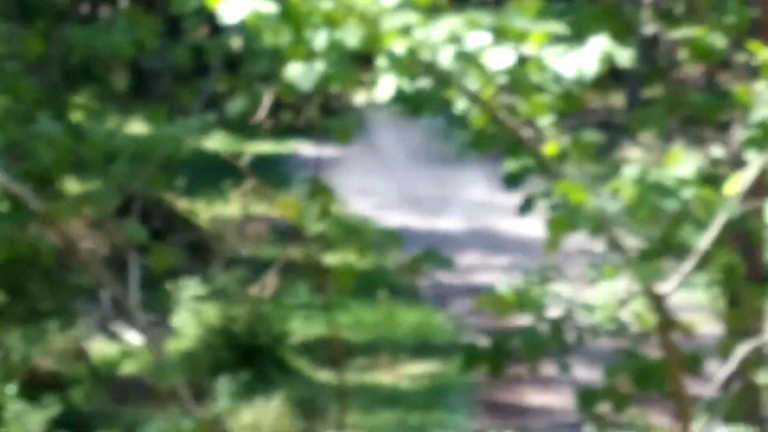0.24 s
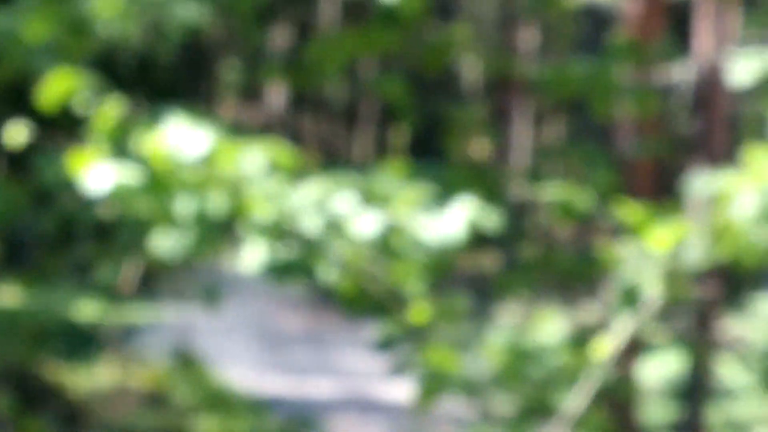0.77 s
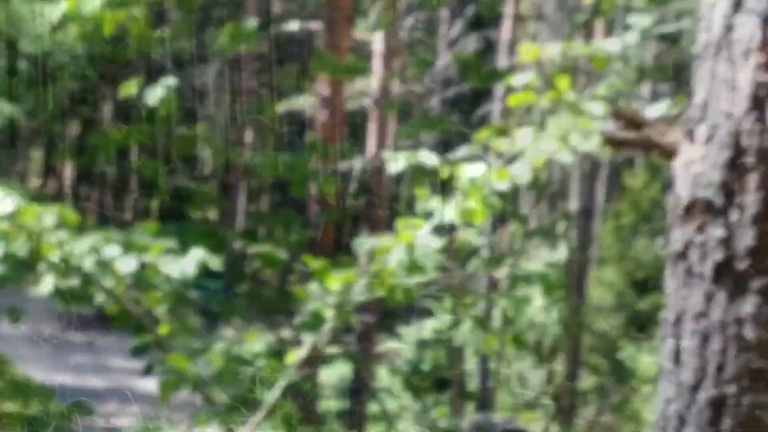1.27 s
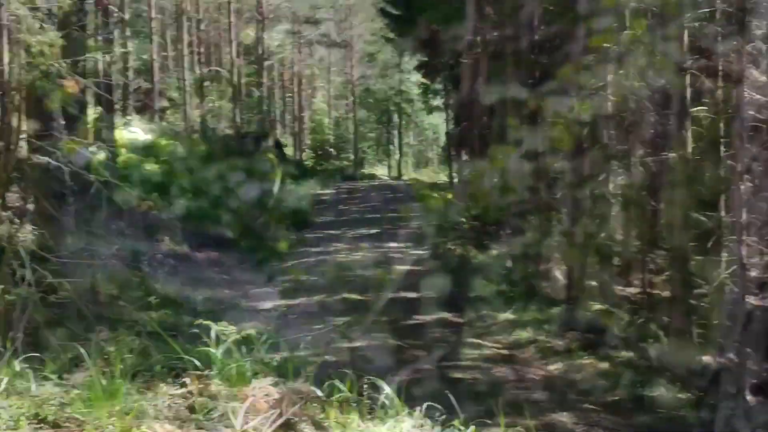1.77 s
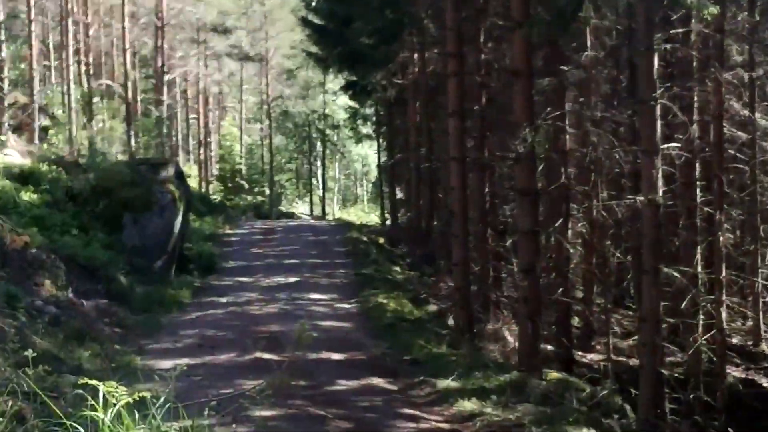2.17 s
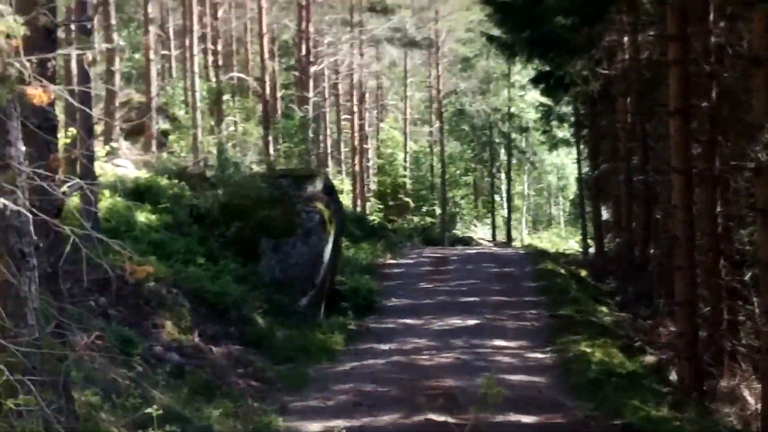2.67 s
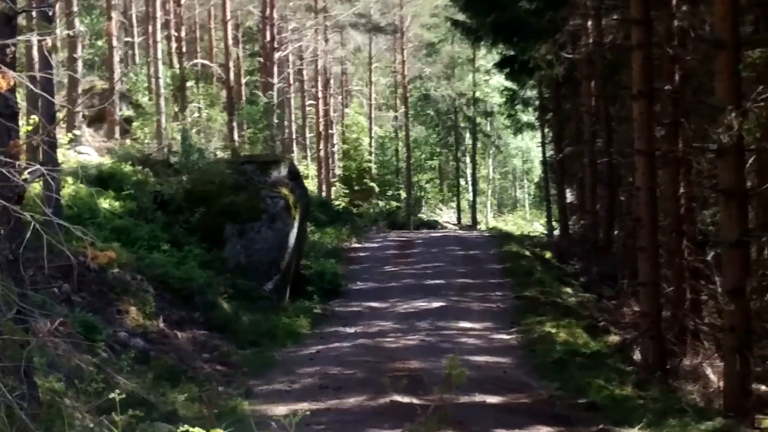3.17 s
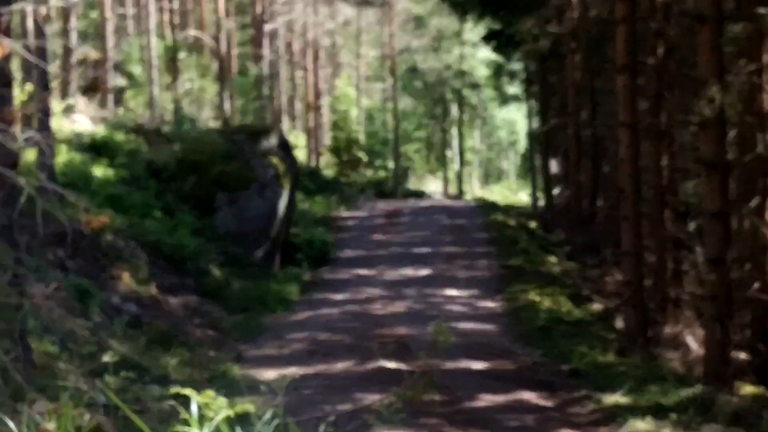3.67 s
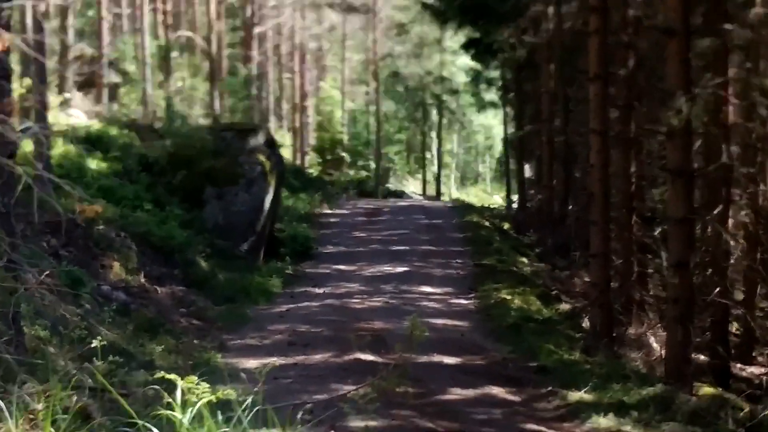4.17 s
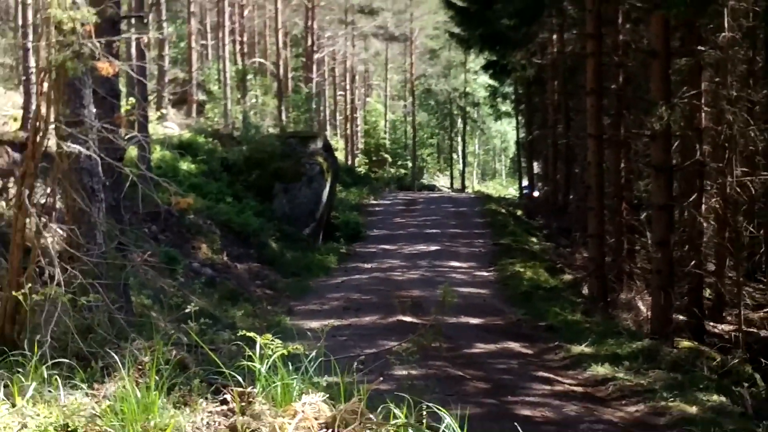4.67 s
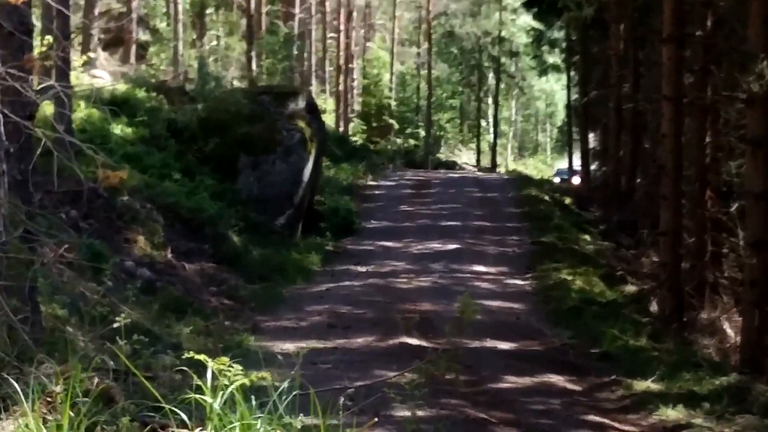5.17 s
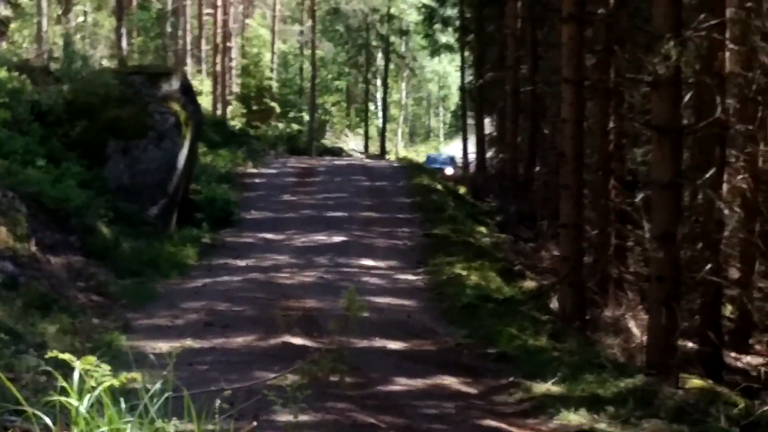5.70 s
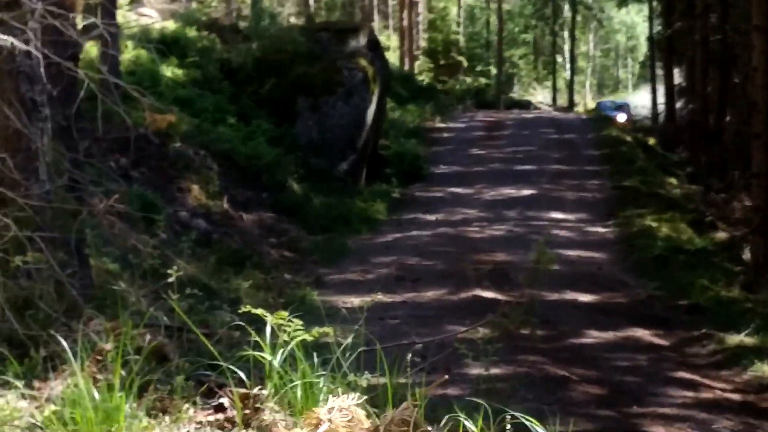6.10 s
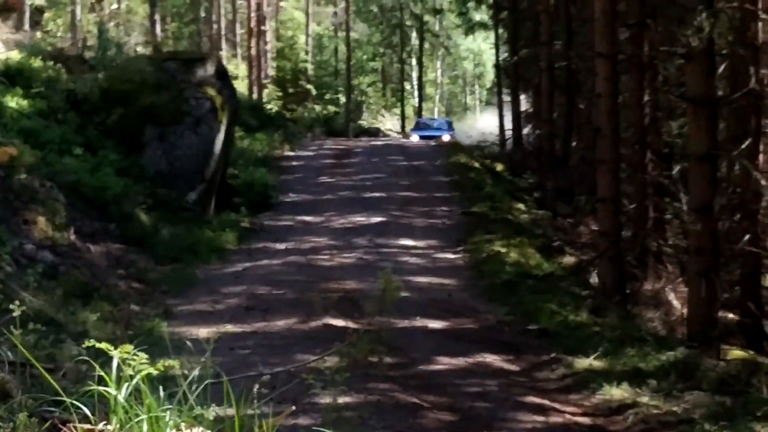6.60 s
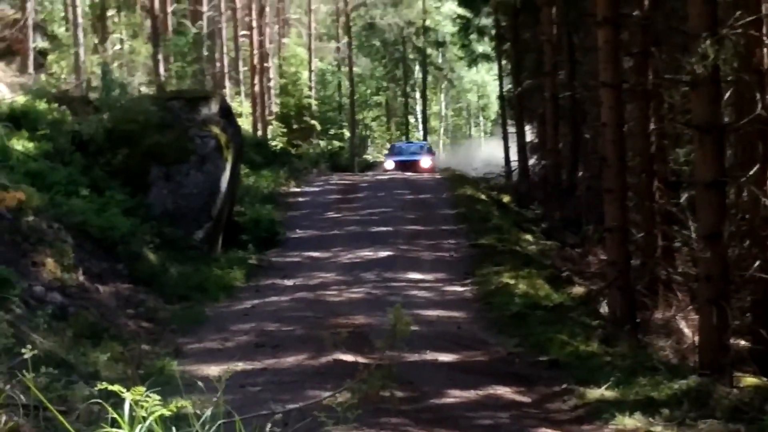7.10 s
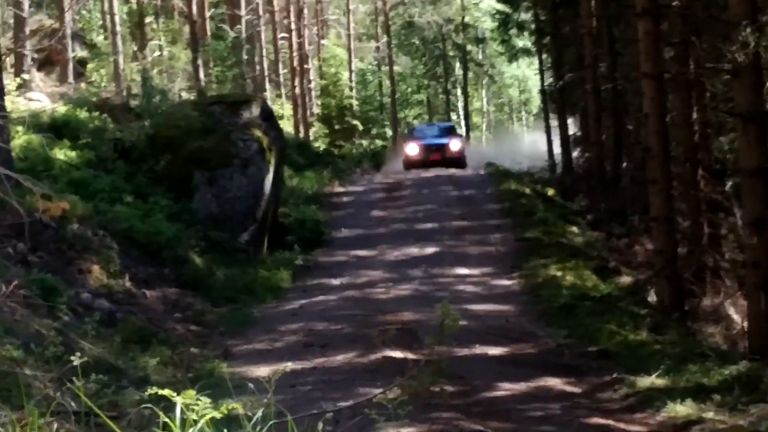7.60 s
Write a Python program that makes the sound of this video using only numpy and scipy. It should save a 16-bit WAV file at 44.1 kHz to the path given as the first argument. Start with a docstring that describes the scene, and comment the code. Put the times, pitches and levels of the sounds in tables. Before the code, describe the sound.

Still forest beside a gravel road, microphone close to the verge. From 0 s a rally car that has just passed roars at overwhelming level, lifts around 0.2 s, bangs at 0.4 s, and fires a cluster of hard exhaust cracks at 0.75-0.85 s as its revs sag. It pulls again, raspy and steely, rising in pitch and fading over gravel until trees cut it off near 1.9 s. From 2.2 s a much quieter second engine barks far away, with gear changes near 3.4 and 4.2 s, echoing among trunks. It lifts around 5.4 s; tyres scrabble in gravel at 5.5-6.2 s and the low engine burbles, with throttle dabs from 6.7 s. Small twigs tick throughout, sharper at 5.9 s and loudest at 6.96 s. Around 7.45 s the car crests: tyre roar surges, grit hisses and stones knock hollowly underneath until the end at about 7.85 s.

```python
"""Two rally cars on a gravel forest road, in still air; twigs snap close by now and then.
The first has just passed: its exhaust (firing tones, pipe overtones, gas noise) lifts, bangs through
a gear change, pulls away over noisy gravel and drops behind the trees. A second car, summed from lines of
its engine cycle, works through the revs far off. It slows for a bend, burbling on dabs of throttle, then
comes over the crest with roaring tyres and stones ringing its floor. Trunks scatter echoes of both."""
import sys
import numpy as np
from scipy import signal
from scipy.fft import rfft, irfft, next_fast_len
from scipy.io import wavfile
from scipy.ndimage import uniform_filter1d, minimum_filter1d

SR = 44100
rng = np.random.default_rng(int(sys.argv[2]) if len(sys.argv) > 2 else 0)


def pcm_store(signal):
    """Save signal as 16-bit PCM."""
    levels = np.round(np.clip(np.atleast_2d(signal), -1, 1) * 32767)
    wavfile.write(sys.argv[1], SR, levels.astype(np.int16).T)


N = 346185
TIME = np.arange(N) / SR  # [s]


def amp(db):
    """Decibels to gain."""
    return 10 ** (np.asarray(db) / 20)


def evened(x):
    """Scales to an rms of one."""
    return x / np.sqrt(np.mean(x ** 2) + 1e-20)


def read(points, hz):
    """A spectrum's gain at hz, interpolated in dB over log frequency."""
    f, db = np.transpose(points)
    return amp(np.interp(np.log(hz + 1), np.log(f + 1), db))


def follow(rows):
    """Each column of a curve table at every sample."""
    s, *columns = np.transpose(rows)
    return [np.interp(TIME, s, c) for c in columns]


def during(span, fade):
    """One within a span of time, decaying exponentially outside it."""
    outside = np.maximum(np.maximum(span[0] - TIME, TIME - span[1]), 0)
    return np.exp(-outside / fade)


def swell(s, width):
    """A Gaussian hump of height one around time s."""
    return np.exp(-((TIME - s) / width) ** 2)


def add(mix, s, sound):
    """Mixes a sound in at time s."""
    part = mix[max(round(s * SR), 0):][:len(sound)]
    part += sound[:len(part)]


def colour(x, points):
    """Gives x a spectrum and an rms of one."""
    size = next_fast_len(len(x) + 4096)
    gain = read(points, np.fft.rfftfreq(size, 1 / SR))
    return evened(irfft(rfft(x, size) * gain, size)[:len(x)])


def drift(hz):
    """Slow chance of rms one, with changes up to about hz."""
    knots = rng.standard_normal(4096)
    return evened(np.interp(TIME * 2 * hz, np.arange(len(knots)), knots))


def fading(turns, depth, hz, scatter=1):
    """A tone by many shifting paths between the trunks; its phase starts up to scatter turns on."""
    angle = 2 * np.pi * (turns + scatter * rng.random())
    in_phase = (1 + depth * drift(hz)) * np.cos(angle)
    quadrature = depth * drift(hz) * np.sin(angle)
    return np.sqrt(2 / (1 + 2 * depth ** 2)) * (in_phase + quadrature)


def puffs(turns, duty, steady):
    """Gas noise that bursts out once a turn, over a steady flow."""
    return (steady + np.exp(-(turns % 1) / duty)) * rng.standard_normal(N)


def throttle(rows, overrun, lift):
    """Each engine quality builds from its overrun value while the throttle is open, falls back on the lift."""
    rest = np.array(overrun)[:, None]
    out = rest + np.zeros(N)
    for opens, shuts, build, *loaded in rows:
        opening = 1 - np.exp(-np.maximum(TIME - opens, 0) / build)
        closing = np.exp(-np.maximum(TIME - shuts, 0) / lift)
        out = out + opening * closing * (np.array(loaded)[:, None] - rest)
    return out


AWAY_S, GONE_S, GONE_FADE_S = 1.133, 1.83, 0.069  # first car draws away; drops behind the trees


def away():
    """Seconds for which the first car has been drawing away."""
    return np.maximum(TIME - AWAY_S, 0)


# first car's revs, sagging through the gear change: (time [s], firing rate [Hz])
NEAR_REVS = [(0, 227.8), (.2, 234), (.3, 235.2), (.45, 217.4), (.56, 217.8), (.66, 211.7), (.76, 177.9),
             (.85, 186.7), (.91, 205.5), (.98, 228.2), (1.1, 238.6), (1.23, 247.8), (1.53, 256.6),
             (1.72, 265.3), (1.82, 273), (2.02, 248)]
# first car on the throttle: (opens [s], shuts [s], build-up [s], firing tone [dB], octave [dB],
# rasp [dB], metallic edge [dB], roughness [0-1])
NEAR_THROTTLE = [(-.1, .222, .02, -10.5, -16, -18, -30, 0.71),
                 (.43, .55, 0.005, -24.5, -26, -22, -35, 0.97),
                 (.84, 1.895, 0.033, -4.5, -17, -15.5, -17, 0.57)]
# exhaust's two lowest resonances, swept by the low tones: (frequency [Hz], gain [dB])
NEAR_BOOM = [(190, 4.5), (228, -1), (246, 0.5), (259, -6.5), (274, -4.5), (455, -3), (490, -3.5), (513, 8),
             (535, -1)]
# tailpipe response to the firing pulses: (frequency [Hz], gain [dB])
NEAR_PIPE = [(560, 6.5), (695, 9.5), (780, -5.5), (920, -2.5), (1020, 10), (1230, 0.5), (1450, -5),
             (1700, -22.5), (2200, -54)]
# gas rush from the tailpipe: (frequency [Hz], relative density [dB per Hz])
NEAR_RUSH = [(25, -26.5), (70, -5), (150, 1.5), (260, 6), (450, 4.5), (800, 2), (1250, 3.5), (1600, -4),
             (2100, -20.5), (3000, -20.5), (6000, -68.5)]
# ring of the thin steel pipe: (frequency [Hz], gain [dB])
NEAR_EDGE = [(1200, -27), (1650, -9), (1980, 8), (2250, 0), (2500, -1), (2950, -12), (3250, -18),
             (4200, -24.5), (5500, -39), (7000, -46), (10000, -55), (14000, -67)]
# throttle shut: firing tone, octave, rasp, edge [dB]; roughness, clipped to 0-1 in use
NEAR_OVERRUN = (-28, -40.5, -29, -39, 1.13)
NEAR_LIFT_S = 0.018
BOOM_FALL_DB_PER_S, RASP_FALL_DB_PER_S, EDGE_FALL_DB_PER_S = 13.5, 14.5, 17.5
CLEARS_PER_S = 0.28  # roughness lost as it pulls away
FLARE_S, FLARE_WIDTH_S, FLARE_DB = 1.222, 0.012, 16  # octave flares briefly
DIP_S, DIP_WIDTH_S, DIP_DB = 1.58, 0.11, -6  # metallic edge dips briefly
EDGE_KNEE_HZ, EDGE_DB_PER_HZ = 226, -0.05  # edge strengthens as the firing rate drops below the knee


def near_car():
    """Four-cylinder exhaust: two low tones, pipe overtones with a steely edge, a gas rush at each firing."""
    hz, = follow(NEAR_REVS)
    tone_db, octave_db, rasp_db, edge_db, rough = throttle(NEAR_THROTTLE, NEAR_OVERRUN, NEAR_LIFT_S)
    gone = away()
    rough = np.clip(rough - CLEARS_PER_S * gone, 0, 1)
    turns = np.cumsum(hz * (1 + 0.0021 * drift(40))) / SR

    tone = amp(tone_db) * read(NEAR_BOOM, hz) * np.cos(2 * np.pi * turns)
    octave_db = octave_db + FLARE_DB * swell(FLARE_S, FLARE_WIDTH_S)
    octave = amp(octave_db) * read(NEAR_BOOM, 2 * hz) * np.cos(4 * np.pi * turns)
    boom = np.sqrt(2) * (tone + octave) * (1 + 0.16 * drift(45)) * amp(-BOOM_FALL_DB_PER_S * gone)

    # the shorter the wave, the more the trunks scatter it
    overtones = [(k, fading(k * turns, depth=0.065 * k, hz=12)) for k in range(3, 14)]
    # unequal cylinders put weak lines between the overtones
    overtones += [(k / 2, 0.0088 * k * fading(k * turns / 2, depth=0.29, hz=14)) for k in range(3, 26, 2)]
    gas = puffs(turns, duty=1.0, steady=0.81) * amp(3.0 * drift(30))

    def voiced(line_points, gas_points):
        """Overtones and gas noise, each through its response, mixed by roughness."""
        lines = evened(sum(read(line_points, k * hz) * line for k, line in overtones))
        return np.sqrt(1 - rough ** 2) * lines + rough * colour(gas, gas_points)

    rasp = amp(rasp_db - RASP_FALL_DB_PER_S * gone) * voiced(NEAR_PIPE, NEAR_RUSH)
    edge_db = edge_db + EDGE_DB_PER_HZ * np.minimum(hz - EDGE_KNEE_HZ, 0)
    edge_db = edge_db + DIP_DB * swell(DIP_S, DIP_WIDTH_S)
    edge = amp(edge_db - EDGE_FALL_DB_PER_S * gone) * voiced(NEAR_EDGE, NEAR_EDGE)
    return (boom + rasp + edge) * during((0, GONE_S), fade=GONE_FADE_S)


# wheels of either car dig into the gravel: (time [s], half-length [s], roar [dB], stone spray [dB])
SKIDS = [(.1, 0.17, -44, -53), (1.29, 0.035, -54, -46), (1.76, .08, -54, -62), (4.097, 0.17, -40.5, -68),
         (5.488, 0.05, -31, -64), (5.806, 0.24, -36.5, -64), (6.187, 0.33, -44, -62),
         (7.572, 0.12, -26, -58)]
# tyre roar: (frequency [Hz], relative density [dB per Hz])
ROAR = [(60, -37.5), (150, -4.5), (220, -12), (300, -5.5), (420, 1.5), (560, 0.5), (720, 3), (940, -6.5),
        (1150, -7), (1500, -14), (2100, -15), (2800, -25), (3600, -33.5), (5000, -64)]
# spray of small stones: (frequency [Hz], relative density [dB per Hz])
SPRAY = [(2000, -7), (3700, 4.5), (4400, -1), (5100, -1), (6200, -5.5), (7600, -12), (9200, -10.5),
         (10200, -22), (12000, -34), (15000, -44)]
# hissing grit: (frequency [Hz], relative density [dB per Hz])
SAND_TONE = [(2500, -38.5), (4000, -8), (4700, -3), (5400, -2), (6300, -12.5), (9500, -24), (11000, -46),
             (15000, -60)]
# wheel rumble: (frequency [Hz], relative density [dB per Hz])
RUMBLE_TONE = [(20, -31.5), (40, -15), (60, 0.5), (90, -2), (140, -1.5), (220, -7.5), (400, -36.5),
               (900, -66.5)]
NEAR_SPRAY_DB, NEAR_RUMBLE_DB, WHEEL_FALL_DB_PER_S = -57, -38.5, 35  # first car; fall as it draws away
CREST_S, CREST_WIDTH_S = 7.455, 0.045  # second car tops the rise, which no longer shields its tyres
APPROACH_DB_PER_S = 5  # second car's growth up to the crest
ROAR_DB, ROAR_CREST_DB = -35, 6.5  # level just below the crest, gain beyond it
SPRAY_DB, SPRAY_CREST_DB = -59.5, 4
SAND_DB, SAND_CREST_DB, SAND_SPAN_S = -57, 6.5, (7.22, 7.85)  # grit in the wheel arches, only close by
RUMBLE_DB = -38


def tyres():
    """Wheels roar and rumble on the loose road (shaped noise), throwing random stone clicks and grit hiss."""
    leaving_db = -WHEEL_FALL_DB_PER_S * away()
    nearing_db = APPROACH_DB_PER_S * np.minimum(TIME - CREST_S, 0)
    in_view = 0.5 + 0.5 * np.tanh((TIME - CREST_S) / CREST_WIDTH_S)
    roar = amp(ROAR_DB + nearing_db + ROAR_CREST_DB * in_view)
    spray = amp(SPRAY_DB + nearing_db + SPRAY_CREST_DB * in_view) + amp(NEAR_SPRAY_DB + leaving_db)
    for s, width, roar_db, spray_db in SKIDS:
        dig = swell(s, width)
        roar = np.hypot(roar, amp(roar_db) * dig)
        spray = np.hypot(spray, amp(spray_db) * dig)
    sand = amp(SAND_DB + SAND_CREST_DB * in_view) * during(SAND_SPAN_S, fade=0.065)
    rumble = amp(RUMBLE_DB + nearing_db) + amp(NEAR_RUMBLE_DB + leaving_db)
    hits = rng.random(N) < 4000 / SR  # about 4000 stones a second
    stones = hits * rng.standard_normal(N) * amp(2 * np.minimum(rng.exponential(1, N), 4))
    return (roar * amp(2.1 * drift(25)) * colour(rng.standard_normal(N), ROAR)
            + spray * amp(2.0 * drift(18)) * colour(stones, SPRAY)
            + sand * amp(1.0 * drift(30)) * colour(rng.standard_normal(N), SAND_TONE)
            + rumble * amp(0.71 * drift(8.6)) * colour(rng.standard_normal(N), RUMBLE_TONE))


# still forest air: (frequency [Hz], relative density [dB per Hz])
AIR = [(20, -27), (100, -12), (200, 12), (600, 1.5), (1500, -6.5), (2600, -9.5), (4000, -27.5),
       (6000, -30.5), (8000, -40.5), (15000, -45)]


def forest_air():
    """Steady shaped noise of the still forest."""
    return amp(-41.5) * colour(rng.standard_normal(N), AIR)


def forest(x, t60, treble_t60):
    """Scattered echoes from the trunks: sparse random taps whose treble dies first."""
    late = np.arange(SR) > SR // 100  # first echo after 10 ms
    taps = rng.standard_normal(SR) * (rng.random(SR) < 2000 / SR) * late
    hz, t, z = signal.stft(taps, SR, nperseg=256)
    decay = np.interp(hz, [300, 5000], [t60, treble_t60])[:, None]
    tail = signal.istft(z * amp(-60 * t / decay), SR, nperseg=256)[1]
    return signal.oaconvolve(x, tail / np.linalg.norm(tail))[:N]


# twig snaps and crackles: (time [s], level [dB], pitch [Hz], decay [s], low body [dB])
TWIGS = [(0.117, -44, 11000, 0.013, -12), (1.141, -39, 10200, 0.0058, -12), (1.167, -46, 9540, 0.0055, -14),
         (2.321, -35.5, 3700, 0.0043, 0), (3.262, -41, 3800, .0018, -9), (4.531, -45, 6023, 0.0015, -9),
         (4.93, -42.5, 4835, 0.0094, -9), (5.906, -27, 3850, 0.001, 2), (5.938, -45, 9200, 0.0018, -9),
         (6.932, -43, 4870, .00088, -9), (6.9604, -16.5, 3300, 0.0012, 7)]


def twigs():
    """Dry wood snaps: a noise tick around its pitch and a very short ring."""
    out, t = np.zeros(N), TIME[:SR // 20]
    for s, db, hz, decay, body_db in TWIGS:
        tick_tone = [(hz / 5, body_db), (hz * 0.39, -6), (hz, 0), (hz * 1.4, -11), (hz * 4, -27)]
        tick = colour(rng.standard_normal(len(t)), tick_tone)
        # two bending modes of a stick
        ring = np.sin(2 * np.pi * hz * t) + 0.89 * np.sin(2 * np.pi * 0.33 * hz * t)
        add(out, s, amp(db) * (0.7 * tick + 0.3 * ring) * np.exp(-t / decay))
    return out


# exhaust bangs of both cars: (time [s], level [dB], decay [s], brightness [dB per octave])
BANGS = [(.413, 0.5, .011, -1), (.527, -8.5, .006, -3), (.75, -4, 0.0096, -0.5), (.764, -5, 0.0055, 3.5),
         (.777, 9.5, .0055, 1.5), (0.794, -16.5, 0.0097, 4.5), (.814, -2.5, 0.0053, 1), (.845, -4, .009, 0),
         (2.063, -31.5, 0.025, 5.5), (5.809, -34.5, 0.022, 3.5)]
# what a bang rings in the exhaust: (frequency [Hz], level [dB])
BANG_MODES = [(85, -31), (165, -11), (238, 2), (410, -6), (520, -7.5), (1000, -20), (1230, -20.5)]


def bangs():
    """Unburnt fuel explodes in the exhaust: a ringing thump with a burst of gas and a steely crack."""
    out, t = np.zeros(N), TIME[:SR // 4]
    for s, db, decay, bright_db in BANGS:
        ring = np.zeros(len(t))
        for hz, mode_db in BANG_MODES:
            detune = rng.uniform(0.92, 1.04)
            ring += amp(mode_db + bright_db * np.log2(hz / 240)) * np.sin(2 * np.pi * hz * detune * t)
        gas = colour(rng.standard_normal(len(t)), NEAR_RUSH)
        crack = colour(rng.standard_normal(len(t)), NEAR_EDGE)
        burst = 2 * t / decay * np.exp(1 - 2 * t / decay)  # peaks at half the decay time
        add(out, s, amp(db) * burst * (ring + amp(-16.5) * gas + amp(-20.0) * crack))
    return out


# second car's revs, through the gears, down for the bend, up to the crest: (time [s], firing rate [Hz])
FAR_REVS = [(2.1, 224.7), (2.4, 209.8), (3.2, 228.7), (3.88, 232.2), (4.17, 251.3), (4.58, 204.8),
            (4.87, 188.9), (5.13, 217), (5.42, 190.3), (5.7, 177.9), (6.03, 129.3), (6.4, 142),
            (6.93, 109.2), (7.1, 128), (7.42, 146), (7.52, 160.6), (7.65, 143.4), (7.85, 140.6)]
# second car on full throttle: (opens [s], shuts [s], build-up [s], boom [dB], bark [dB], rasp [dB])
FAR_THROTTLE = [(2.22, 2.3, 0.016, -34, -40, -52), (2.38, 3.4, 0.11, -35, -37.5, -43.5),
                (3.53, 4.18, 0.04, -33.5, -39, -43), (4.56, 5.44, 0.16, -33.5, -33.5, -41.5)]
# low lines, spread by uneven cylinders: (multiple of the four-stroke cycle, level [dB])
FAR_LOPE = [(2, -27.5), (3, -7.5), (4, 1.5), (5, -3), (6, -44), (7, -12.5), (8, -6.5), (9, -14), (10, -22),
            (11, -52)]
# exhaust resonances the low lines slide through: (frequency [Hz], gain [dB])
FAR_BOOM = [(96, 17.5), (112, -3.5), (150, 0), (220, 1.5), (335, 3), (378, 5), (415, -1.5), (475, 1.5)]
# pipe bark: (frequency [Hz], relative density [dB per Hz])
FAR_BARK = [(250, -34.5), (400, -11.5), (500, 0.5), (600, -0.5), (690, 2), (760, 4.5), (900, -8),
            (1050, -5.5), (1150, 1), (1260, -11.5), (1600, -65)]
# exhaust rasp: (frequency [Hz], relative density [dB per Hz])
FAR_RASP = [(1000, -37), (1350, -8), (1590, 2), (1900, -9), (2130, -5.5), (2450, -6), (2680, -8.5),
            (3100, -11), (3700, -21.5), (4600, -28.5), (7000, -57.5)]
FAR_OVERRUN = (-46.5, -45.5, -51)  # throttle shut: boom, bark, rasp [dB]
FAR_LIFT_S = 0.12
FAR_SPAN_S = (2.22, 5.79)  # from coming into earshot to braking for the bend
# rasp treble: gain on coming into earshot, and its growth as the car nears through the trees
FAR_TREBLE_HZ, FAR_TREBLE_DB, FAR_TREBLE_DB_PER_S = 2700, -5.5, 3.5


def far_car():
    """A loping engine deep in the trees: low lines of its cycle under a bark and a rasp."""
    hz, = follow(FAR_REVS)
    boom_db, bark_db, rasp_db = throttle(FAR_THROTTLE, FAR_OVERRUN, FAR_LIFT_S)
    cycle_hz = hz / 4  # four firings a cycle
    cycle = np.cumsum(cycle_hz * (1 + 0.002 * drift(15))) / SR

    boom = np.zeros(N)
    for k, db in FAR_LOPE:
        line = fading(round(k) * cycle, depth=0.42, hz=6, scatter=0.29)
        boom += amp(db) * read(FAR_BOOM, k * cycle_hz) * line
    boom = evened(boom)

    overtones = []
    for k in range(11, 48):
        firing = k % 4 == 0  # multiples of the firing rate stand out
        overtones.append((k, amp(0.72 * firing) * fading(k * cycle, depth=0.77, hz=7)))
    gas = puffs(cycle, duty=0.31, steady=0.95)

    def pipe(points, gas_db):
        """Overtones and puffs of gas through one part of the exhaust's response."""
        lines = evened(sum(read(points, k * cycle_hz) * line for k, line in overtones))
        return evened(lines + amp(gas_db) * colour(gas, points))

    bark, rasp = pipe(FAR_BARK, gas_db=-2), pipe(FAR_RASP, gas_db=1)
    lowpass = signal.butter(N=4, Wn=FAR_TREBLE_HZ, fs=SR, output="sos")
    body = signal.sosfiltfilt(lowpass, rasp)
    heard_s = np.clip(TIME, *FAR_SPAN_S) - FAR_SPAN_S[0]
    rasp = body + (rasp - body) * amp(FAR_TREBLE_DB + FAR_TREBLE_DB_PER_S * heard_s)
    blare = (amp(bark_db) * bark + amp(rasp_db) * rasp) * amp(1.5 * drift(12))
    return amp(boom_db) * boom * during(FAR_SPAN_S, fade=0.05) + blare * during(FAR_SPAN_S, fade=0.41)


# second car, dabs of throttle: (opens [s], shuts [s], build-up [s], firing tone [dB], octave [dB], rasp [dB])
BEND_THROTTLE = [(5.64, 5.88, 0.017, -40.5, -39, -44.5), (6.7, 7.0, 0.022, -33.5, -47.5, -49.5),
                 (7.02, 7.28, 0.022, -45, -49, -46.5), (7.45, 7.61, 0.039, -36.5, -31, -41.5),
                 (7.66, 7.85, 0.015, -53, -38.5, -43.5)]
BEND_OVERRUN = (-43, -55, -61)  # throttle shut: firing tone, octave, rasp [dB]
BEND_SPAN_S = (5.6, 7.85)


def coasting_car():
    """Light throttle through the bend: firing tone and octave burble on; each dab changes them and the rasp."""
    hz, = follow(FAR_REVS)
    tone_db, octave_db, rasp_db = throttle(BEND_THROTTLE, BEND_OVERRUN, lift=0.055)
    turns = np.cumsum(hz * (1 + 0.0071 * drift(15))) / SR
    tone = amp(tone_db) * fading(turns, depth=0.25, hz=9)
    octave = amp(octave_db) * fading(2 * turns, depth=0.25, hz=9)
    rasp = amp(rasp_db) * colour(puffs(turns, duty=0.51, steady=0.96), FAR_RASP)
    return (tone + octave + rasp) * during(BEND_SPAN_S, fade=0.03)


# stones flung against the second car's floor at the crest: (time [s], level [dB], pitch [Hz])
KNOCKS = [(7.494, -13, 705), (7.520, -17, 684), (7.534, -14, 665), (7.545, -10.5, 707), (7.587, -8.5, 590),
          (7.613, -14.5, 567), (7.786, -16.5, 755)]


def knocks():
    """Each stone rings two modes of the underbody guard for a few cycles."""
    out, t = np.zeros(N), TIME[:SR // 20]
    for s, db, hz in KNOCKS:
        ring = np.sin(2 * np.pi * hz * t) + amp(-13) * np.sin(2 * np.pi * 2.736 * hz * t)
        add(out, s, amp(db) * ring * np.exp(-t / 0.0033) * (1 - np.exp(-t / 0.00052)))
    return out


def scene():
    """Both cars with their forest echoes, tyres and twigs, over the still air."""
    near = near_car() + bangs()
    far = far_car() + coasting_car() + knocks()
    near_echo = amp(-15) * forest(near, t60=0.6, treble_t60=0.35)
    far_echo = amp(-10.0) * forest(far, t60=0.8, treble_t60=0.53)
    return (near + far + near_echo + far_echo + tyres() + twigs() + forest_air())[None]


BAND_LIMIT_HZ = 15800


def record(dry):
    """A fast limiter holds the loudest peaks at full scale; then a low-pass limits the band."""
    allowed = 1 / np.maximum(abs(dry), 1)
    limited = dry * uniform_filter1d(minimum_filter1d(allowed, size=260), size=200)
    lowpass = signal.firwin(511, BAND_LIMIT_HZ, window=("kaiser", 9), fs=SR)
    return signal.oaconvolve(limited, lowpass[None], "same")


dry = scene()
out = record(dry)
pcm_store(out)
```